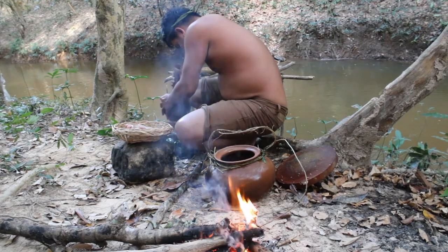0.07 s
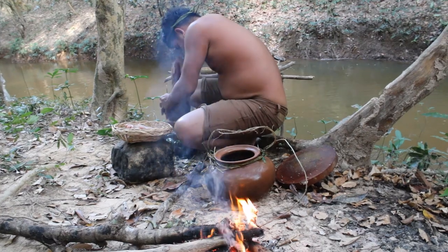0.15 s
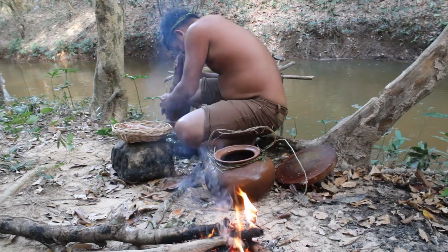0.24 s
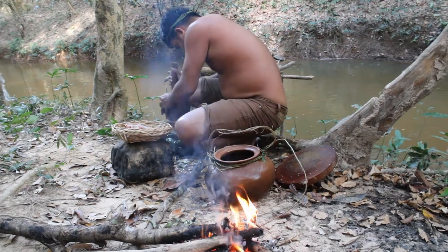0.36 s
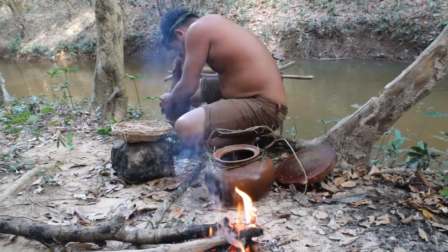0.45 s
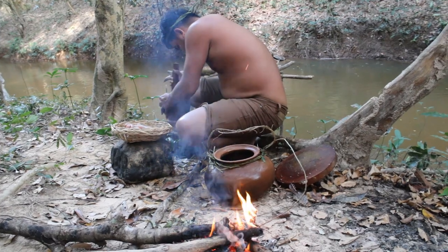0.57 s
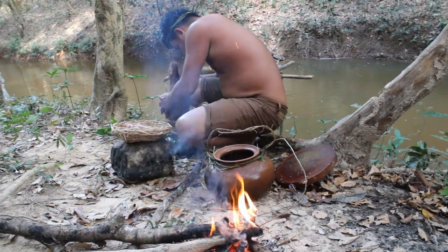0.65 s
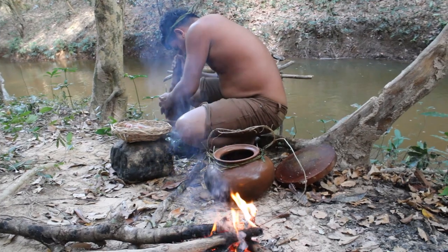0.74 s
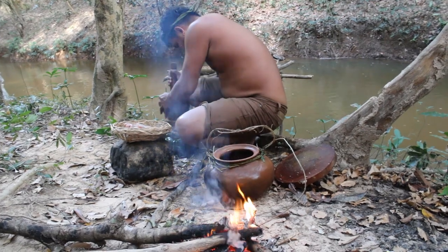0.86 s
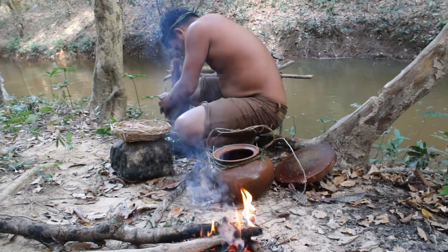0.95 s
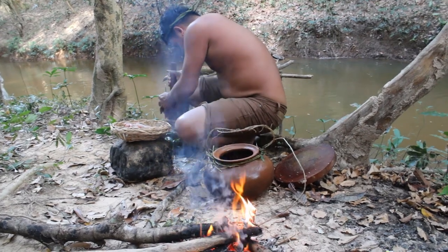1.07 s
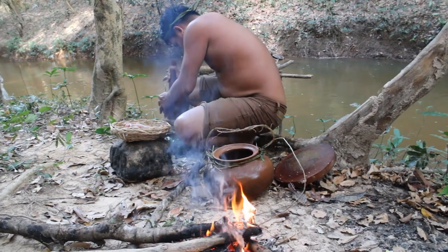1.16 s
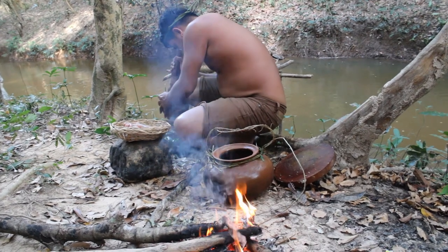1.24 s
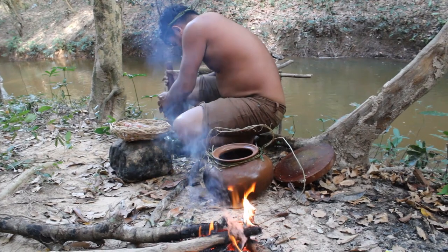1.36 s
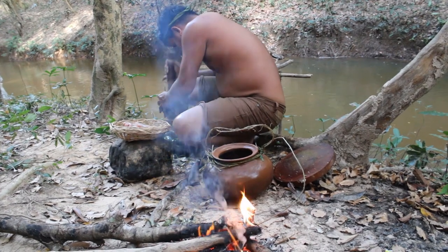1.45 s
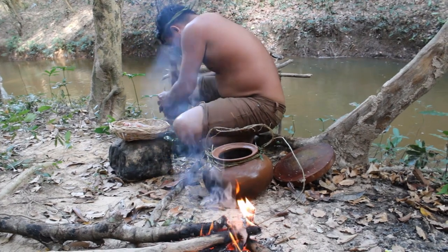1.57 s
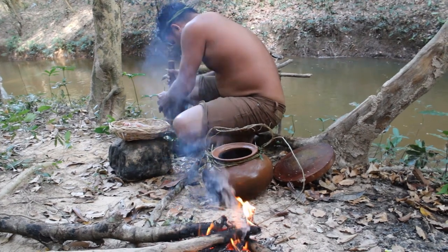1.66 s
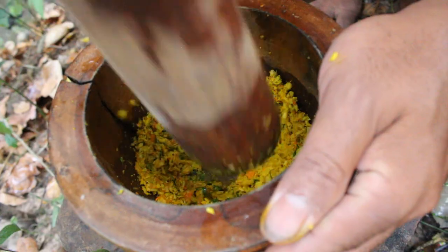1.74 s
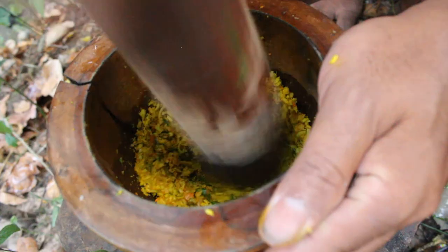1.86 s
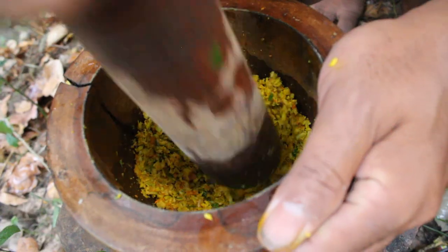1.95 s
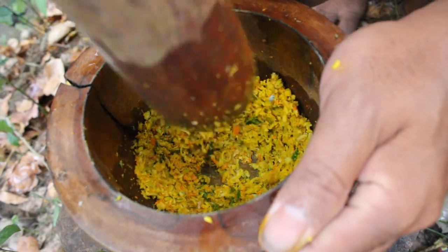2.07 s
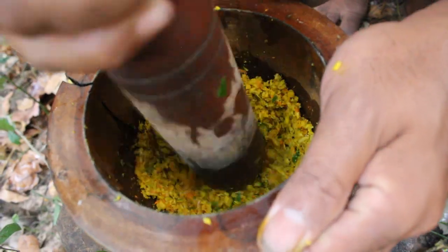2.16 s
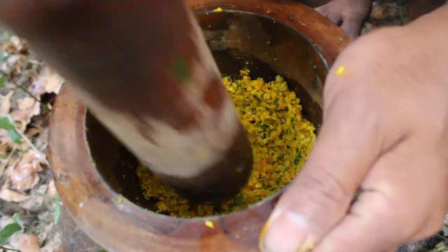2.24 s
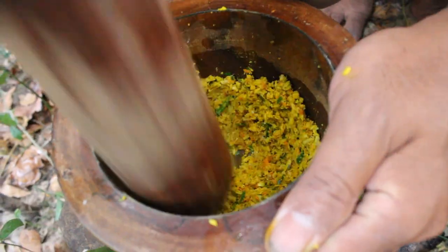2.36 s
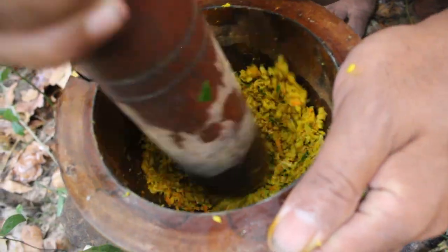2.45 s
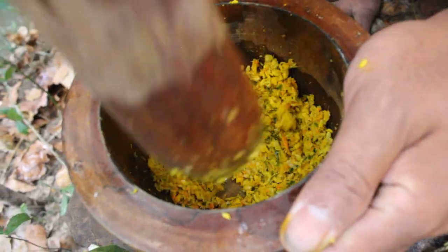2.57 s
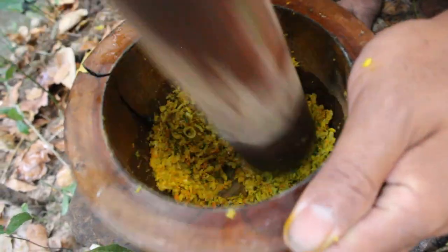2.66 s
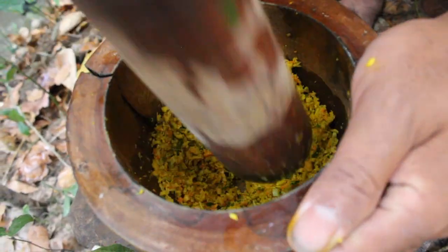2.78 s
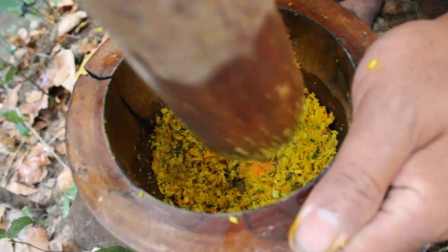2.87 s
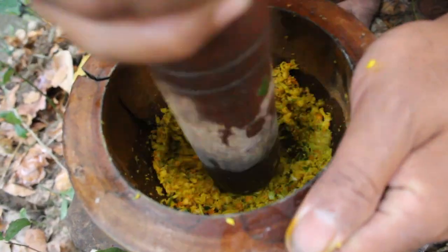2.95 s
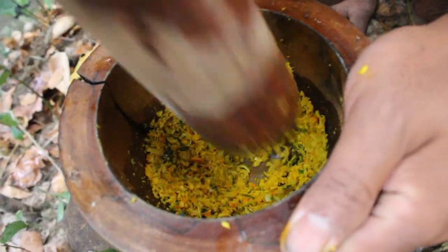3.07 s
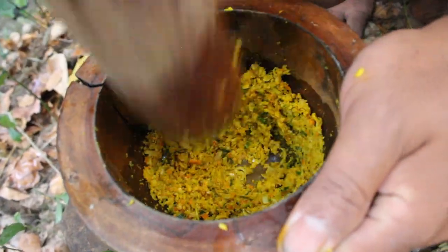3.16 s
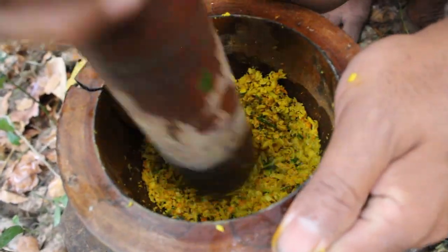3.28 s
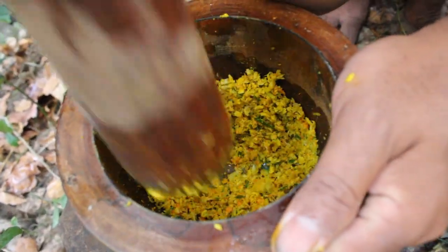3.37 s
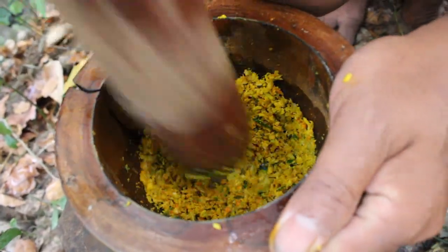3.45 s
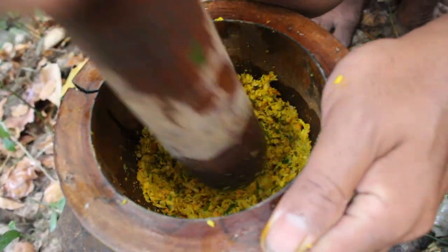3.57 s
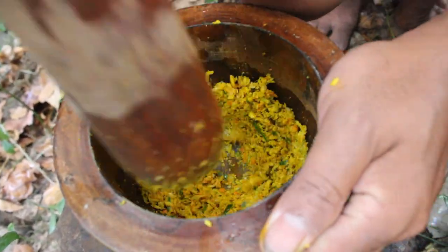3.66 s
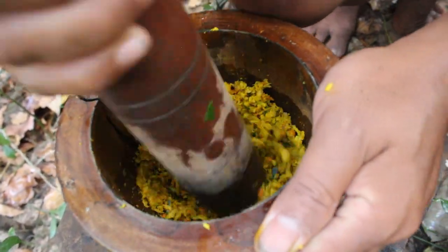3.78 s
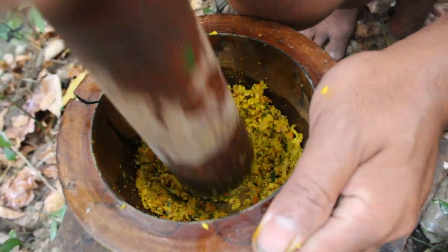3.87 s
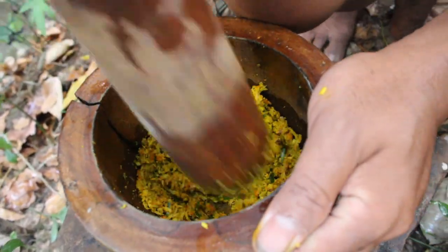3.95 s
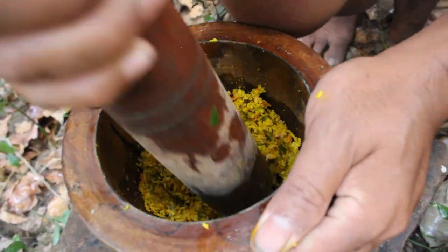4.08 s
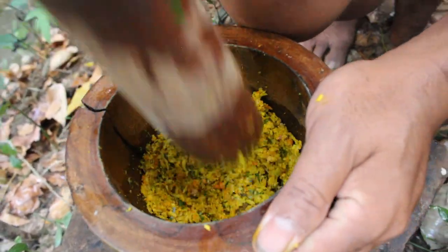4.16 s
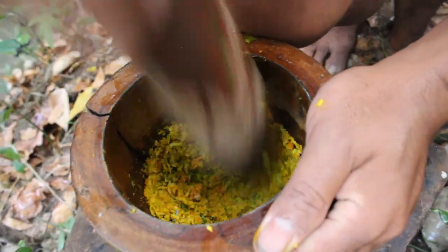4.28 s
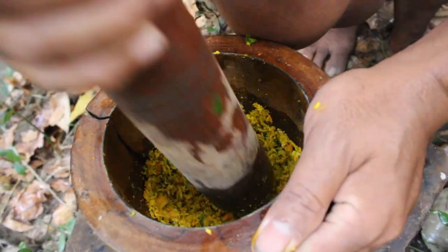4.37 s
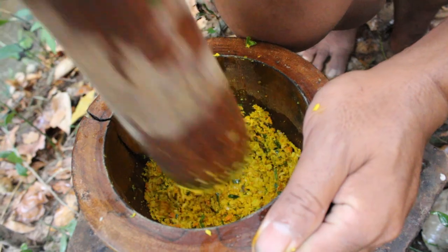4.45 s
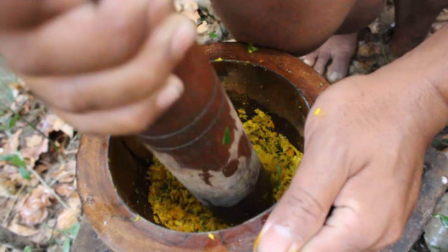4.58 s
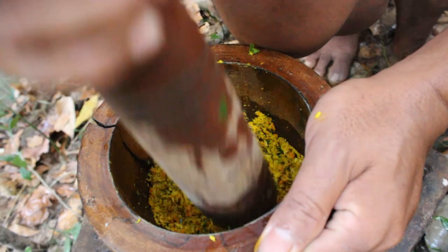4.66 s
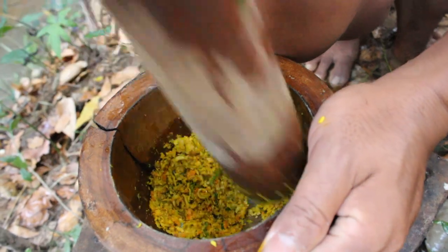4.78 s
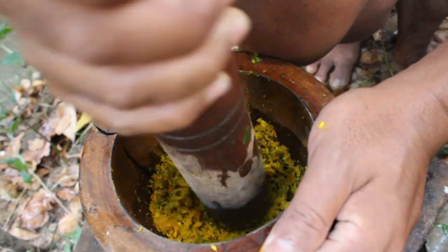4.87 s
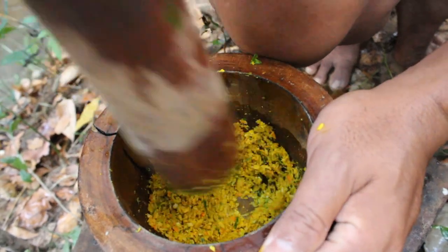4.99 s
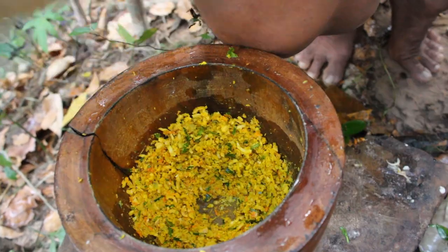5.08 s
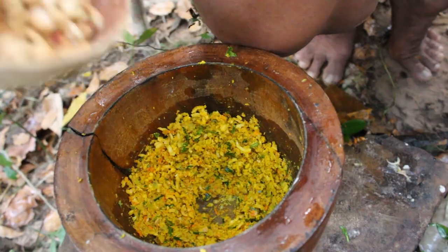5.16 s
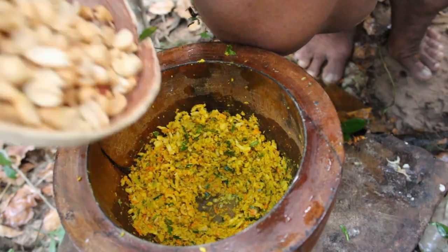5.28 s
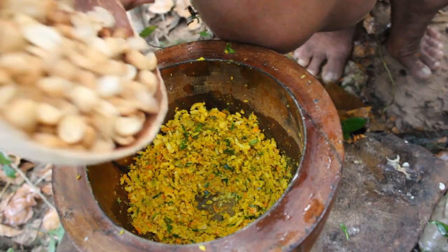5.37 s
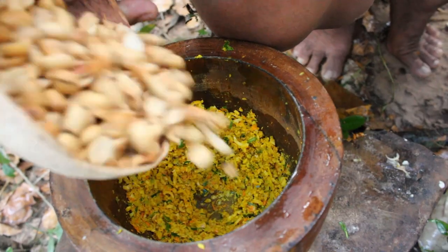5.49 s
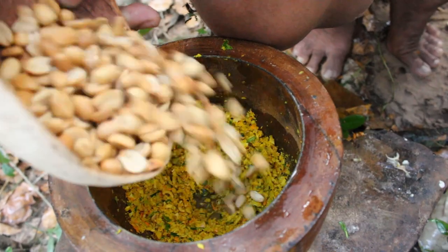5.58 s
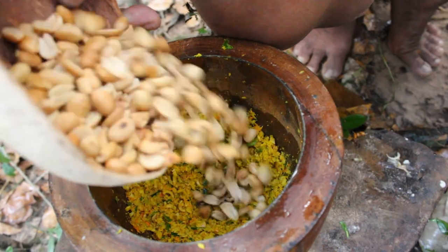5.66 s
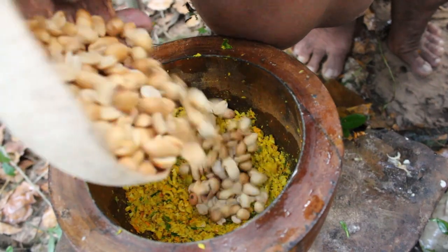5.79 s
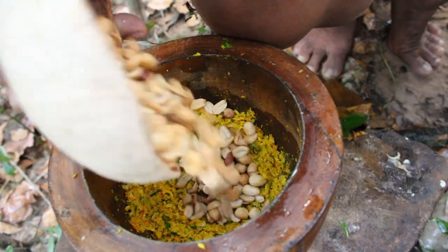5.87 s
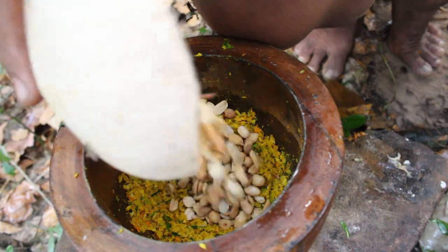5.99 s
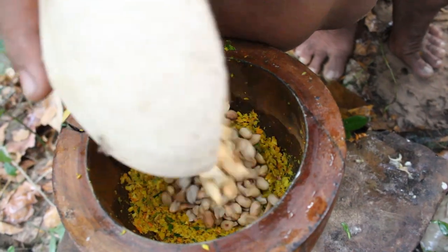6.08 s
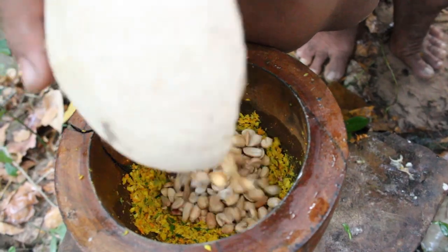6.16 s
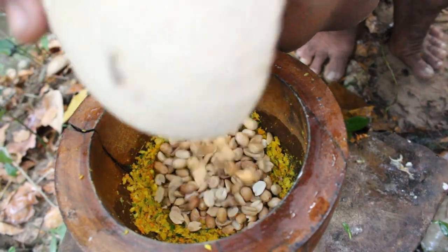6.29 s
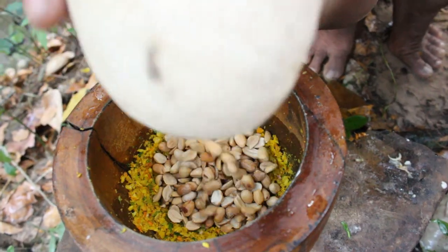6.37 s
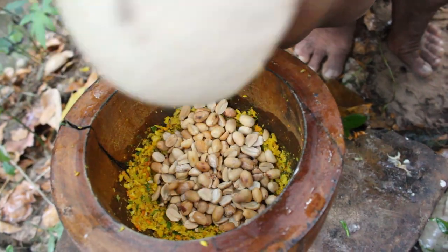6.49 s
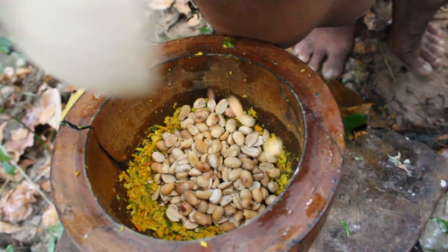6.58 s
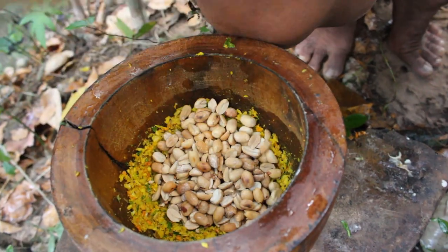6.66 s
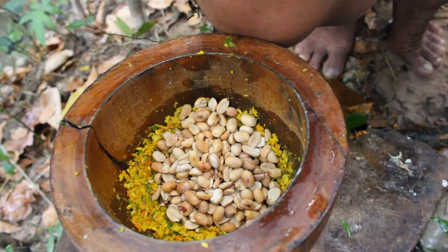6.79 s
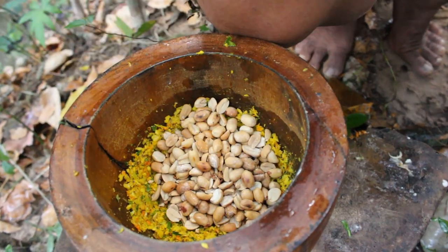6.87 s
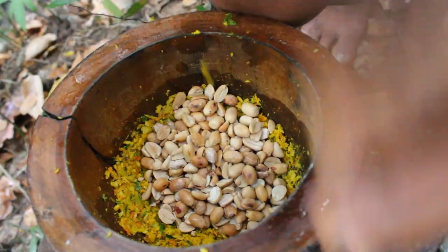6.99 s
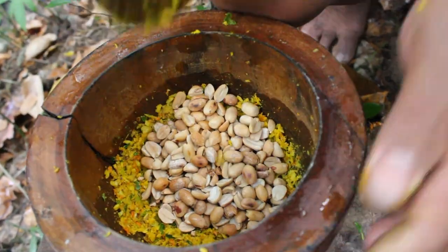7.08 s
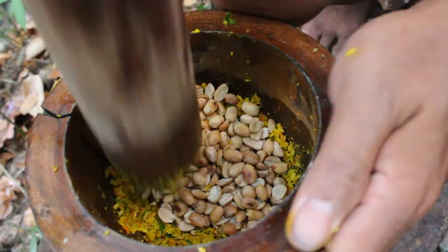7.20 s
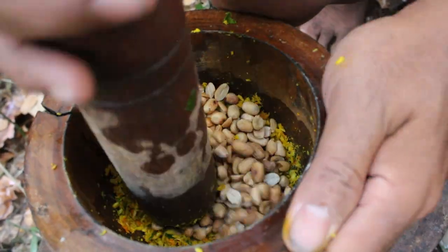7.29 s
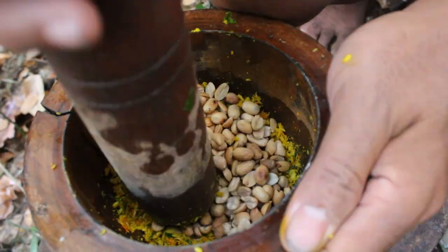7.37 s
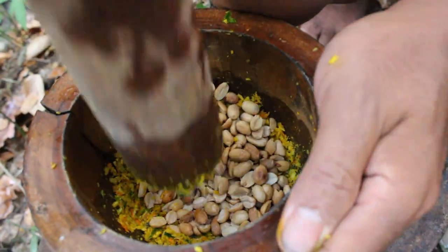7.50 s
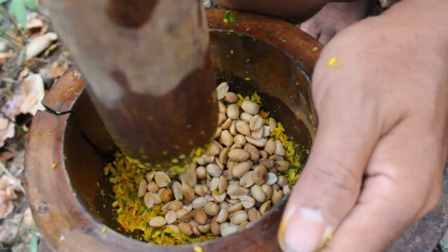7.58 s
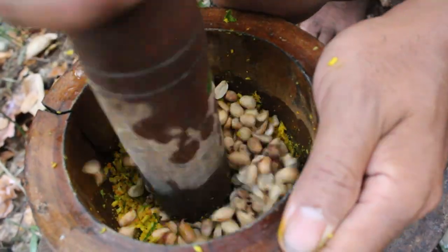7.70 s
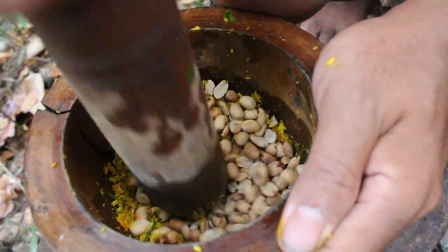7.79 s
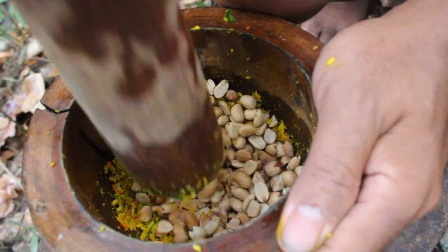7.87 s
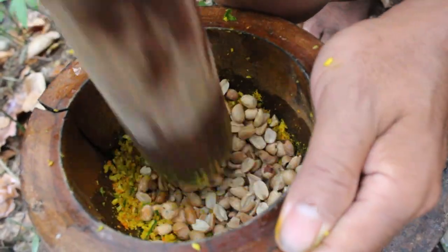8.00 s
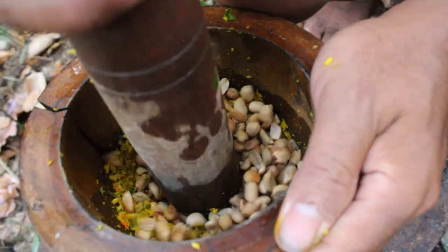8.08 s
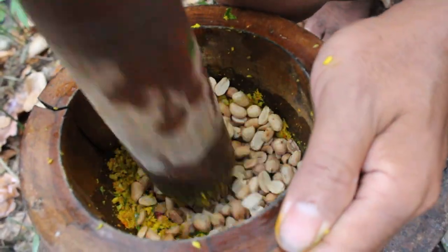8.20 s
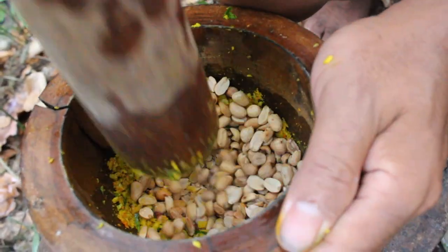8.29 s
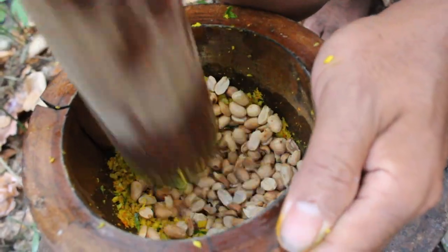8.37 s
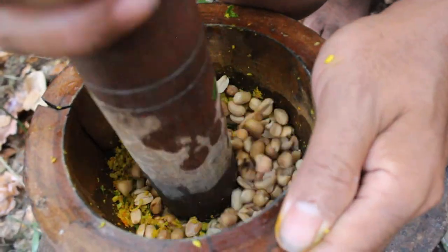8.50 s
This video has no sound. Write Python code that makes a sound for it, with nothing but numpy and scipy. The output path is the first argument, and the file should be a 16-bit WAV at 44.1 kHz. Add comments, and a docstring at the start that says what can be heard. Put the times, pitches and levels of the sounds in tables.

```python
"""A forest clearing: a wooden pestle pounds herbs in a wooden mortar, heard first from afar, then close.
Peanuts are poured in as clusters of short damped sines, then pounded in turn. Each blow is a burst of crushing
noise and a knock of decaying modes; the trees answer with scattered noise echoes. Wavering tones make a cricket
and far birds, coloured noise the forest air. Four shots are cut together at one microphone, whose gain control
turns down after loud blows and whose loudest peaks clip."""
import sys
import numpy as np
from scipy import signal
from scipy.fft import rfft, irfft, next_fast_len
from scipy.io import wavfile
from scipy.ndimage import uniform_filter1d, map_coordinates

SR = 44100
rng = np.random.default_rng(int(sys.argv[2]) if len(sys.argv) > 2 else 0)


def generate_wav(sig):
    """Save sig (samples, or channels by samples) to the path in sys.argv[1] as 16-bit PCM at SR."""
    pcm = np.round(np.clip(np.atleast_2d(sig).T, -1, 1) * 32767).astype(np.int16)
    wavfile.write(sys.argv[1], SR, pcm)


N = 376613

# All levels are relative, ahead of the gains in the functions.
# Shots, far and close: (start [s], echo of the trees [dB], ground relative to base [dB],
# ring of the bowl under crushing [dB], life of ground and crumbs [1 = full], lift of the pestle's top mode [dB])
SHOTS = [(0, -21.5, 1, -11, 1.1, 15), (1.769, -41.5, -10.5, -10.5, .3, 5), (5.103, -33, -5, -10, .3, -6),
         (7.062, -38.5, 1, -5, .3, -20)]

# Forest air in each shot: (rumble level [dB], rustle level [dB])
AIR_LEVELS = [(-58, -59.5), (-66, -68), (-58, -59.5), (-60, -59)]
# Colour of the low outdoor rumble: (frequency [Hz], density [dB per Hz])
RUMBLE_COLOUR = [(12, -38), (20, 3), (59, -2), (243, -2.5), (468, -10), (612, -7.5), (748, -6),
                 (1100, -24.5), (1430, -37.5), (2420, -120)]
# Colour of leaves and fire: (frequency [Hz], density [dB per Hz])
RUSTLE_COLOUR = [(530, -29.5), (900, -3.5), (1650, -5.5), (3150, -7), (5590, -10), (7760, -10.5),
                 (13300, -33.5), (14400, -31), (15000, -54), (16500, -60)]
# Insects, far birds and one brief rustle, as wavering bands:
# (start [s], end [s], start pitch [Hz], end pitch [Hz], width [Hz], level [dB])
SONGS = [(0, .3, 7500, 7500, 150, -74), (4.785, 4.87, 4000, 7200, 2500, -62),
         (5.11, 7.06, 7720, 7720, 120, -66), (1.8, 1.96, 4100, 4100, 200, -76),
         (4.17, 4.29, 1960, 1960, 110, -74), (3.245, 3.265, 7100, 7500, 150, -72),
         (3.47, 3.51, 7200, 7900, 150, -70)]

# Blows; food is crushed, then wood meets wood: (time [s], crush level [dB], crush length [s], knock delay [ms],
# bowl level [dB], favoured bowl pitch [Hz], base relative to bowl [dB], pestle relative to bowl [dB])
BLOWS = [(0.1434, -27, 0.023, 3.3, -28, 1020, 1, -7.5), (0.397, -28, 0.028, 6, -37, 767, 4.6, -2),
         (0.6488, -26, 0.022, 2.8, -23, 744, -7.5, -13.5),
         (0.9021, -25.5, 0.0091, 2.9, -11, 758, -14, -4.5), (1.156, -23, 0.017, 8.3, -39, 570, 6.5, 4),
         (1.406, -30.5, 0.043, 2.5, -24.5, 800, -7.5, -5.5),
         (1.665, -34, 0.11, 2.2, -21.5, 673, -15.5, -21), (1.9652, -6, 0.019, 8.6, -16.5, 659, -6.5, -6.5),
         (2.226, -7.5, 0.027, 5.2, -15.5, 638, -5, -15.5), (2.493, -9.5, 0.032, 2.1, -10.5, 607, -16, -9.5),
         (2.7634, -6, 0.021, 7.5, -16.5, 618, -11, -16), (3.026, -7, 0.029, 7.4, -12.5, 819, -4.5, -13.5),
         (3.295, -9.5, 0.032, 10, -19.5, 744, -6.5, -8),
         (3.5801, -0.5, 0.0076, 1.8, -7.5, 701, -10.5, -3.5), (3.8415, -2, 0.014, 4.2, -17, 693, -4, -4),
         (4.1, -9.5, 0.021, 8.6, -19.5, 848, -5, -7), (4.353, -18, 0.0069, 1.6, -2.5, 642, -47.5, -14),
         (4.385, -12, 0.036, 0.328, -15.5, 676, -14, -19), (4.6617, -4.5, 0.0107, 3, -8, 867, -12, -4.5),
         (4.912, -15.5, 0.072, 3, -2, 800, -35, -13.5), (7.313, -30.5, 0.026, 5, -37, 760, -22, -2.5),
         (7.3345, -10, 0.031, 13, -29, 780, -25, 16), (7.7447, -7, 0.031, 8, -21.5, 770, -49.5, 13.5),
         (7.818, -50, 0.011, 3, -34, 820, -30, -14), (8.1165, -8, .031, 10.5, -23.5, 710, -11, 16),
         (8.191, -39, .01, 2.8, -36.5, 830, -32, -21), (8.509, -6, 0.02, 2.1, -24, 744, -14, 4)]
# Colour of crushed food: (frequency [Hz], density [dB per Hz])
PASTE_COLOUR = [(590, -22.5), (1000, -18), (1210, -21.5), (1840, -9.5), (2170, -11.5), (7260, -8.5),
                (12900, -33.5), (14800, -50), (16500, -62)]
# Air and wall of the bowl under small contacts: (centre [Hz], width [Hz], level [dB])
HOLLOW_MODES = [(655, 110, -12.5), (1780, 480, -1.5), (3360, 510, -2.5)]
# Modes of the ground under the mortar: (frequency [Hz], level [dB], nominal t60 [s])
GROUND_MODES = [(126, 2, 0.11)]
# Modes of the mortar's base: (frequency [Hz], level [dB], t60 [s])
BASE_MODES = [(176.9, 2.2, 0.041), (242.1, 1.3, 0.063), (380, 5.6, 0.031), (487, 3.5, 0.037)]
# Modes of the bowl, leaning toward each blow's pitch: (nominal frequency [Hz], level [dB], t60 [s])
BOWL_MODES = [(494, -9, 0.075), (656, 4, 0.05), (783.4, 2, 0.051), (1010, -4.5, 0.039)]
# Modes of the pestle: (frequency [Hz], level [dB], t60 [s])
PESTLE_MODES = [(1845, 4, .044), (1180, -14, .03), (1480, -16, .03), (2200, -14, .025), (2710, -8, .03)]
# How long the trunks answer in each band: (frequency [Hz], t60 [s])
TREE_DECAY = [(150, 0.41), (700, 0.94), (1500, 0.96), (2700, 0.94), (8000, 0.5)]
# A knock just before the second shot leaves its echo in it: (time [s], bowl level [dB])
EARLIER_KNOCK = (1.66, 5.9)
# Thin ticks, perhaps the fire: (time [s], level [dB], middle pitch [Hz])
TICKS = [(0.261, -48, 6800), (0.601, -46, 7700), (0.6245, -38, 7810), (0.7746, -46, 7330),
         (0.8205, -47, 6350), (2.165, -42, 7650), (2.3845, -51, 7730), (2.4468, -51, 7900),
         (4.6242, -39.5, 6700)]

# Nuts tumbling in the pour: (time [s], level [dB], middle pitch [Hz])
POUR = [(5.103, -57.5, 3600), (5.36, -53.5, 3470), (5.4, -42.5, 2780), (5.64, -41, 3600),
        (5.77, -32.5, 5600), (5.9, -38.5, 6050), (5.97, -44.5, 5300), (6.0, -35.5, 4280), (6.2, -32, 5200),
        (6.31, -34.5, 5040), (6.33, -43, 5030), (6.45, -45, 5100), (6.56, -55, 5700)]
# Nuts rolling between blows: (time [s], level [dB], middle pitch [Hz])
ROLL = [(7.79, -54.5, 3950), (8.09, -57.5, 3930), (8.17, -62, 3950), (8.36, -58, 4070), (8.43, -47.5, 4500),
        (8.49, -63, 4050)]
# Single nuts that click: (time [s], level [dB], middle pitch [Hz])
NUT_CLICKS = [(5.2102, -19, 1620), (5.2484, -26, 1810), (5.2892, -25, 1360), (5.3228, -14, 2140),
              (5.3966, -19.5, 2690), (5.4802, -19, 3800), (5.4962, -14, 4060), (5.568, -26, 3560),
              (5.583, -18.5, 4150), (5.658, -17.5, 4900), (5.7005, -17, 4700), (5.759, -16.5, 2860),
              (5.7684, -10.5, 5000), (5.8177, -37, 6550), (5.895, -13.5, 6560), (5.913, -3, 8300),
              (5.957, -10.5, 7700), (5.987, -5.5, 7640), (6.0062, -19.5, 3700), (6.0746, -17, 5200),
              (6.1865, -15.5, 3880), (6.2464, -15, 3400), (6.2701, -17, 6850), (6.3076, -12, 6590),
              (6.355, -25.5, 1920), (6.3968, -31, 1780), (6.422, -12, 7160), (6.4667, -15, 6400),
              (6.4966, -29, 6060), (6.5332, -25, 1820), (6.727, -15.5, 6500), (6.7321, -19, 7340),
              (6.7424, -18.5, 6000), (7.5288, -37, 4050), (7.8212, -29, 1900), (7.9294, -27, 5570),
              (7.9854, -37, 3430), (8.185, -27, 3680), (8.2003, -27, 3150), (8.3946, -33, 3600),
              (8.4093, -49, 3660), (8.441, -27, 3640)]
# Colour of nut on nut: (frequency [Hz], level [dB])
SHELL_COLOUR = [(300, -54), (650, -15), (1100, -4.5), (1800, 0.5), (4000, 1), (7000, 5.5), (10000, -5.5),
                (15000, -18)]
# Soft scuffs after the pour: (time [s], level [dB])
SCUFFS = [(6.5986, -38.5), (6.797, -40.5)]

# Gain control, a quick and a slow stage: (pull-down for each dB over [dB per s], recovery time constant [s])
GAIN_STAGES = [(24.7, .2), (3, 1.2)]

SNAP_DB, SNAP_DB_PER_MS = -1, -1.5  # a short delay before the knock gives the crush a harder first snap
SPATTER_DB = -29.5  # relative to the crush
LEAD = 170  # samples of soft first contact
DRUM_DB, DRUM_DB_PER_S = -9.5, -15.5  # the bowl drums under the pour, less as it fills
GAIN_FROM_DB, SENSE_S = -23.5, 0.018  # gain control threshold and averaging time
TOP_HZ = 16600  # band limit


def amp(db):
    """Gain of a level in dB."""
    return 10 ** (np.asarray(db) / 20)


def unit(x):
    """x at rms 1."""
    return x / np.sqrt(np.mean(x ** 2) + 1e-20)


def along(points, hz):
    """(frequency [Hz], value) points read on a log frequency axis."""
    f, v = np.transpose(points)
    return np.interp(np.log(hz + 1), np.log(f + 1), v)


def curves(rows):
    """One value per sample for each column after the time."""
    s, *cols = np.transpose(rows)
    return [np.interp(np.arange(N) / SR, s, c) for c in cols]


def wobble(rate):
    """A smooth random curve, rate knots a second."""
    knots = rng.standard_normal(int(N * rate / SR) + 4)
    return map_coordinates(knots, [np.arange(N) * rate / SR])


def filtered(x, response):
    """x times a complex response of frequency."""
    m = next_fast_len(len(x) + 8192)
    return irfft(rfft(x, m) * response(np.fft.rfftfreq(m, 1 / SR)), m)[:len(x)]


def resonance(hz, centre, width):
    """Response of one damped resonance, 1 at its centre."""
    return 1j * hz * width / (centre ** 2 - hz ** 2 + 1j * hz * width)


def shot(s):
    """The row of the shot that holds the moment s, and the sample where it ends."""
    row = [row for row in SHOTS if row[0] <= s][-1]
    later_cuts = [round(row[0] * SR) for row in SHOTS if row[0] > s]
    return row, min([N] + later_cuts)


def add(track, s, sound):
    """Mixes a sound in at s seconds; it ends where its shot ends."""
    start, end = round(s * SR), shot(s)[1]
    track[start:end][:len(sound)] += sound[:end - start]


def patchy(spectrum, patchy_db):
    """Coloured noise of rms 1 with soft patches of random gain."""
    z = signal.stft(rng.standard_normal(N), nperseg=512)[2]
    field = uniform_filter1d(rng.standard_normal(z.shape), 8, 0)  # smooth over frequency
    field = uniform_filter1d(field, 10, 1)  # then over time
    noise = signal.istft(z * amp(patchy_db * unit(field)), nperseg=512)[1][:N]
    return unit(filtered(noise, lambda hz: amp(along(spectrum, hz))))


def air():
    """A low outdoor rumble and the rustle of leaves and fire, both noise that swells a little."""
    cuts = [round(row[0] * SR) for row in SHOTS]
    which = np.searchsorted(cuts, np.arange(N), "right") - 1
    rumble_db, rustle_db = np.transpose(AIR_LEVELS)[:, which]
    rumble = amp(rumble_db + 1.4 * wobble(8.2)) * patchy(RUMBLE_COLOUR, patchy_db=2.0)
    rustle = amp(rustle_db + .7 * wobble(9.9)) * patchy(RUSTLE_COLOUR, patchy_db=3.0)
    return rumble + rustle


def songs():
    """Insects, far birds and a brief rustle: each a steady or gliding tone shaken by slow noise."""
    out = np.zeros(N)
    for start, end, from_hz, to_hz, width_hz, db in SONGS:
        u = np.linspace(0, 1, int((end - start) * SR))
        phase = 2 * np.pi * np.cumsum(from_hz + (to_hz - from_hz) * u) / SR
        in_phase = wobble(width_hz)[:len(u)] * np.sin(phase)
        quadrature = wobble(width_hz)[:len(u)] * np.cos(phase)
        fade = np.clip(8 * u * (1 - u), 0, 1)
        add(out, start, amp(db) * (in_phase + quadrature) * fade)
    return out


def hollow(hz):
    """The bowl's air and wall answer small contacts as a few broad resonances."""
    return sum(amp(db) * resonance(hz, centre, width) for centre, width, db in HOLLOW_MODES)


def crush(db, length, snap_db, ring_db, spatter_db, life):
    """Dense snaps while the food gives way, sounding the bowl; then a faint spatter as it falls back."""
    t = np.arange(SR // 4) / SR
    bursts_db = 2.7 * map_coordinates(rng.standard_normal(len(t)), [t * 700])
    spiky = rng.standard_normal(len(t)) * amp(bursts_db)
    length = np.clip(length, .002, .05)
    press = (1 - np.exp(-(t / 0.0063) ** 2)) * np.exp(-(t / length) ** 3 * 2)
    snap = amp(snap_db) * np.exp(-((t - .0035) / 0.0037) ** 2)
    spatter = amp(spatter_db) * np.exp(-((t - length - .016) / 0.0058) ** 2)
    crumbs = amp(-14.5 - 60 * t / (0.29 * life)) * (t > .003)
    paste = unit(filtered(spiky, lambda hz: amp(along(PASTE_COLOUR, hz))))
    paste = paste * (press + snap + spatter + crumbs)
    paste[:LEAD] *= amp(np.linspace(-20, 0, LEAD))  # the first crumbs give way softly
    bowl = amp(ring_db + 3.0) * filtered(unit(spiky) * press, hollow)
    return amp(db - 11.5) * (paste + bowl)


def knock(bowl_db, ground_db, base_db, pestle_db, bowl_hz, ground_life, lift_db):
    """Struck wood rings in decaying, drifting modes, the bowl's near bowl_hz favoured; hard knocks start fast."""
    t = np.arange(SR // 5) / SR
    # the spot that is hit pulls the bowl's pitches and favours the nearest
    bowl = [(hz * (bowl_hz / hz) ** .2, db - 26 * abs(np.log(hz / bowl_hz)), t60)
            for hz, db, t60 in BOWL_MODES]
    ground = [(hz, db, t60 * ground_life) for hz, db, t60 in GROUND_MODES]
    rod = [(hz, db + lift_db * (hz > 2500), t60) for hz, db, t60 in PESTLE_MODES]
    # (modes, level [dB], relative pitch scatter)
    parts = [(ground, ground_db, .06), (BASE_MODES, base_db, .08), (bowl, 0, .01), (rod, pestle_db, .008)]
    ring = np.zeros(len(t))
    for modes, part_db, scatter in parts:
        for hz, mode_db, t60 in modes:
            decay = amp(part_db + mode_db + rng.normal(0, 2.4) - 60 * t / t60)
            drift = .011 * np.cumsum(rng.standard_normal(len(t)))  # wandering phase [rad]
            ring += decay * np.sin(2 * np.pi * hz * rng.normal(1, scatter) * t + drift)
    thwack = rng.standard_normal(len(t)) * amp(-60 * t / .03)  # the many short modes between
    thwack = filtered(thwack, lambda hz: resonance(hz, 1400, 900))
    ring += amp(pestle_db + 8 + 0.77 * lift_db) * thwack
    rise_s = np.clip(0.00086 * amp(-.9 * (bowl_db + 4)), 1e-4, .007)
    return amp(bowl_db + 0.5) * ring * (1 - np.exp(-(t / rise_s) ** 2))


def trees(x):
    """The scattered answer of the trunks: a noise tail, each band dying at its own speed."""
    hz, t, z = signal.stft(rng.standard_normal(SR // 2), SR, nperseg=256)
    t60 = np.clip(along(TREE_DECAY, hz), .05, 5)[:, None]
    tail = signal.istft(z * amp(-60 * t / t60) * (t > .02), SR, nperseg=256)[1]
    return signal.fftconvolve(x, tail / np.linalg.norm(tail))


def earlier_echo(out):
    """Mixes in the trees' late answer to the knock just before the second shot."""
    cut, wet_db, _, _, life, lift_db = SHOTS[1]
    knock_s, bowl_db = EARLIER_KNOCK
    before = knock(bowl_db, -30, -25, -15, 690, life, lift_db)
    add(out, cut, amp(wet_db) * trees(before)[round((cut - knock_s) * SR):])


def pestle():
    """Each blow crushes food, then knocks wood; both get a fresh echo from the trees."""
    out = np.zeros(N)
    for s, crush_db, length, delay_ms, bowl_db, bowl_hz, base_db, pestle_db in BLOWS:
        _, wet_db, ground_db, ring_db, life, lift_db = shot(s)[0]
        snap_db = SNAP_DB + SNAP_DB_PER_MS * delay_ms
        food = crush(crush_db, length, snap_db, ring_db, SPATTER_DB, life)
        wood = knock(bowl_db, base_db + ground_db, base_db, pestle_db, bowl_hz, life, lift_db)
        for start, sound in [(s, food), (s + delay_ms / 1000, wood)]:
            add(out, start, sound)
            add(out, start, amp(wet_db) * trees(sound))
    earlier_echo(out)
    return out


def grains(s, db, hz, cycles):
    """Each small contact is a damped sine with a soft start, decaying over so many cycles."""
    n = np.arange(192)
    turns = hz[:, None] * n / SR
    envelope = np.exp(-turns / cycles) * (1 - np.exp(-(turns / 0.31) ** 2))
    shapes = amp(db)[:, None] * np.sin(2 * np.pi * turns) * envelope
    at = (s * SR).astype(int)[:, None] + n
    return np.bincount(at.ravel(), shapes.ravel(), N + 192)[:N]


def clicks(rows, spread, length):
    """A click is a quick cluster of ten short rings spread around its pitch, the later ones fainter."""
    s, db, hz = (np.repeat(c, 10) for c in np.transpose(rows))
    late = rng.exponential(1, len(s))
    offset = np.tile(np.linspace(-1.5, 1.5, 10), len(rows)) + rng.normal(0, .15, len(s))
    ring_hz = np.clip(hz * np.exp(spread * offset), 900, 10000)
    return grains(s + length * late, db - 7.0 - 3 * late, ring_hz, cycles=0.71)


def ticks():
    """Thin ticks, perhaps the fire: tight clusters of short high rings."""
    return amp(11.0) * clicks(TICKS, spread=0.14, length=0.00051)


def tumble(rows, per_second, spread_db, clump_db):
    """Hard nuts knock together at random, in clumps; the higher contacts ring shorter and are weighted up."""
    level_db, centre_hz = curves(rows)[:2]
    start, end = rows[0][0], rows[-1][0]
    draw = rng.random((int(per_second * (end - start)), 2))
    s = start + draw[:, 0] * (end - start)
    at = (s * SR).astype(int)
    hz = np.clip(centre_hz[at] * np.exp(rng.normal(0, 0.539, len(s))), 500, 10000)
    size_db = -spread_db * np.log(draw[:, 1] + 0.00079)  # few strong contacts, many weak
    size_db = size_db + clump_db * wobble(220)[at] + 10 * np.log10(hz)
    rattle = grains(s, size_db, hz, cycles=1.56)
    return amp(level_db) * rattle / np.std(rattle[int(start * SR):int(end * SR)])


def drumming():
    """Nuts landing drum the air in the bowl: uneven noise through one resonance, fading as it fills."""
    level_db, since = curves(POUR)[0], np.arange(N) / SR - POUR[0][0]
    pouring = (since > 0) * (since < POUR[-1][0] - POUR[0][0])
    landing = rng.standard_normal(N) * amp(3.5 * wobble(45)) * pouring
    drum = unit(filtered(landing, lambda hz: resonance(hz, 660, 130)))
    return amp(level_db + DRUM_DB + DRUM_DB_PER_S * since) * drum


def scuffs():
    """Soft scuffs after the pour, each a short quiet crush."""
    out = np.zeros(N)
    for s, db in SCUFFS:
        add(out, s, crush(db, length=0.025, snap_db=-14, ring_db=-9, spatter_db=-25, life=.3))
    return out


def nuts():
    """Pour, rolling and single clicks, coloured by shell and bowl, with the drumming and the scuffs."""
    pour = amp(1.76 * wobble(25)) * tumble(POUR, per_second=6800, spread_db=2, clump_db=3.5)
    roll = tumble(ROLL, per_second=2500, spread_db=3.3, clump_db=5)
    single = amp(5.5) * clicks(NUT_CLICKS, spread=0.52, length=0.0008)
    in_bowl = lambda hz: (1 + amp(-9.5) * hollow(hz)) * amp(along(SHELL_COLOUR, hz))
    return filtered(single + pour + roll, in_bowl) + drumming() + scuffs()


def gain_control(x):
    """Level over the threshold pulls the gain down; it creeps back in two stages, afresh in each shot."""
    size = int(SENSE_S * SR)
    # padding delays the average so that it only looks back
    power = np.abs(np.pad(uniform_filter1d(x ** 2, size), (size // 2, 0))[:N])
    over_db = np.clip(10 * np.log10(power + 1e-12) - GAIN_FROM_DB, 0, None)
    parts = np.split(over_db, [round(row[0] * SR) for row in SHOTS[1:]])
    down_db = np.zeros(N)
    for pull, recovery_s in GAIN_STAGES:
        feedback = [1, -np.exp(-1 / (recovery_s * SR))]
        down_db += np.concatenate([signal.lfilter([pull / SR], feedback, p) for p in parts])
    return x * amp(-down_db)


def scene():
    """Everything at one microphone."""
    return (pestle() + nuts() + ticks() + air() + songs())[None]


def record(dry):
    """The microphone loses deep bass and high treble; then gain control, near-hard clipping and a band limit."""
    microphone = lambda hz: 1j * hz / (35 + 1j * hz) / (1 + 1j * (hz / 11000) ** 3)
    heard = gain_control(filtered(dry[0], microphone))
    clipped = heard / (1 + np.abs(heard / .38) ** 12) ** (1 / 12)
    return filtered(clipped, lambda hz: hz < TOP_HZ)[None]


dry = scene()
out = record(dry)
generate_wav(out)
```